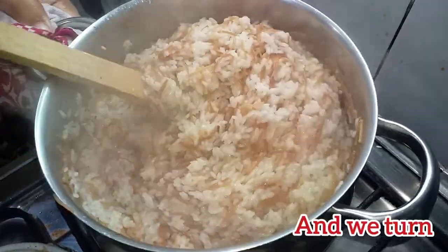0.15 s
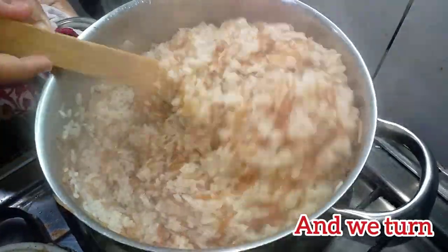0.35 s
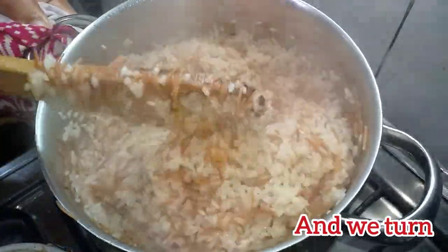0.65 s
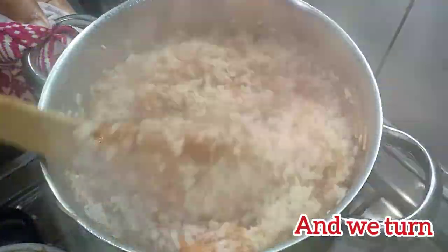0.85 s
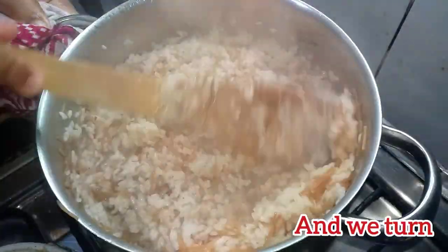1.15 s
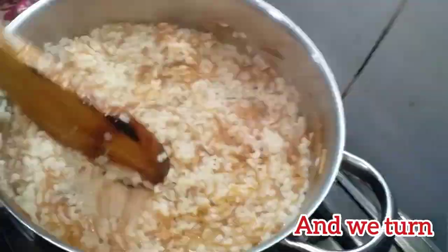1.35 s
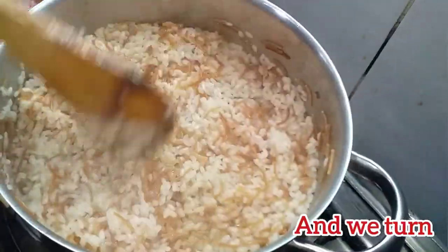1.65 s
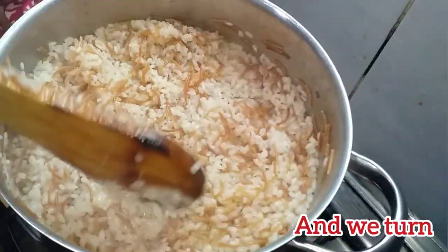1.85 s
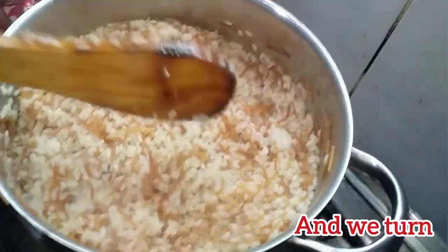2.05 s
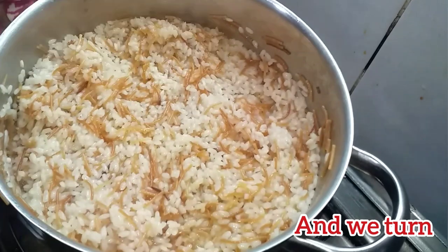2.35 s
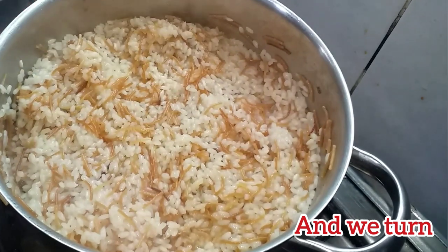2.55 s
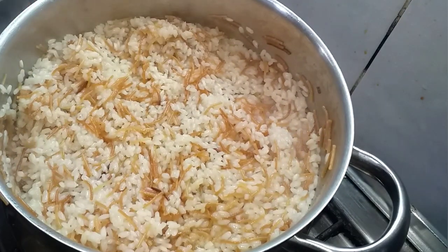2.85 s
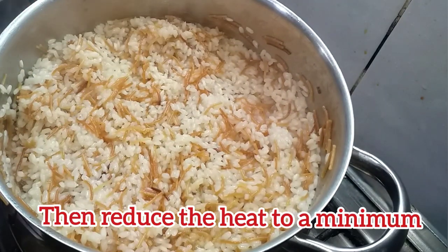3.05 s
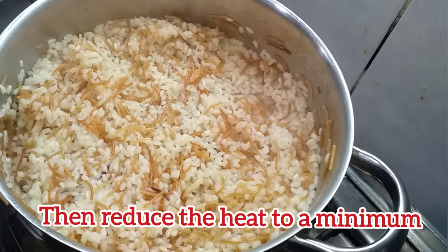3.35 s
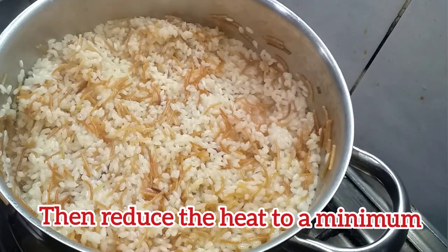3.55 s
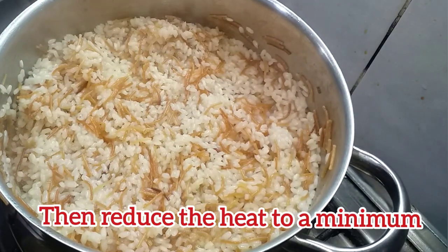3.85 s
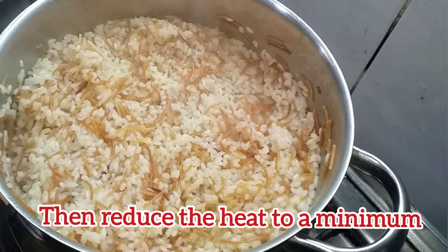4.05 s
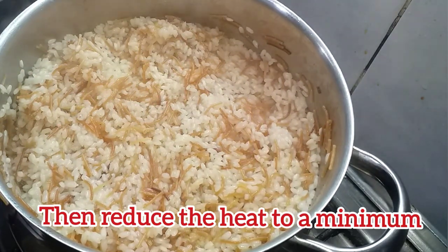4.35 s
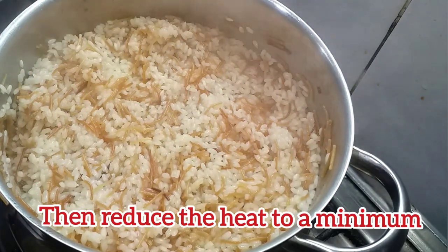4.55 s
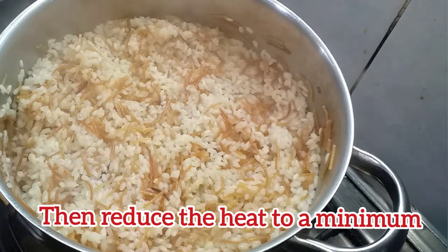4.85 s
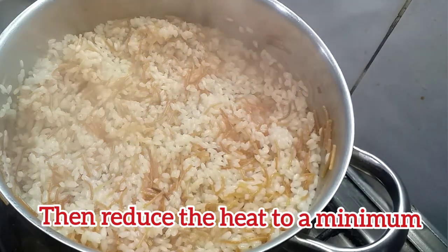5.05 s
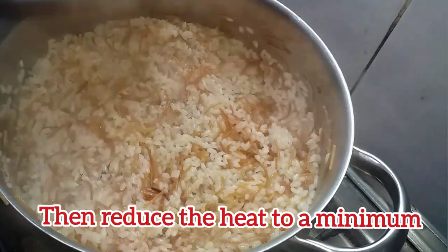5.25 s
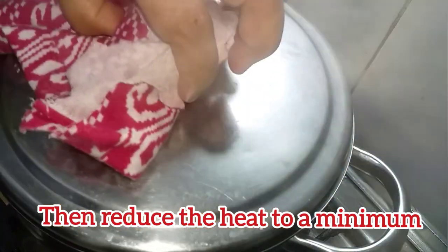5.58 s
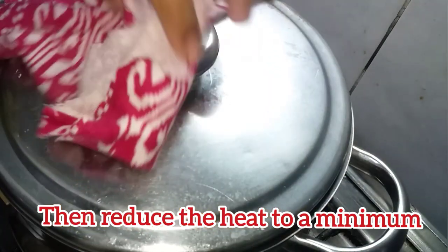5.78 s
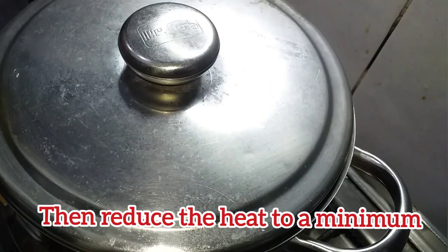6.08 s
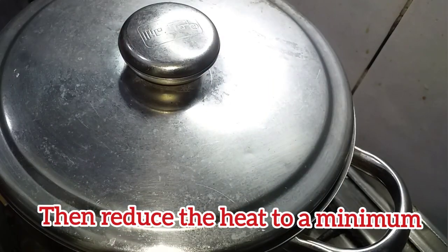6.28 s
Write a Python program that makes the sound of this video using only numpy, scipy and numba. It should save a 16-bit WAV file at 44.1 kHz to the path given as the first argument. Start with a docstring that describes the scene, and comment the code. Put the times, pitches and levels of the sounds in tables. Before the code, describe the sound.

Close to a steel pot in a small kitchen, rice simmers faintly while a wooden spoon scrapes through it and bumps the sides. A quick cluster of hollow knocks lands on the rim. Then come a ringing metal tap, a louder lid clink and scattered light scrapes, ending with a brief rattle as the lid settles. The contacts have a short, dull echo.

```python
"""A wooden spoon knocks and scrapes in a steel pot full of rice, close by in a small kitchen.
Each contact is a short run of micro-slips: knocks ring the belly, wall and bright steel, scrapes only
the wall and steel. A lid clinks, the pot's free rim rings twice and sticky grains tick as they part.
A simmer and room hum waver underneath; hard walls add a short echo to the contacts."""
import sys
import numpy as np
from scipy import signal
from scipy.fft import rfft, irfft
from scipy.io import wavfile
from scipy.ndimage import uniform_filter1d
from numba import njit

SR = 44100
rng = np.random.default_rng(int(sys.argv[2]) if len(sys.argv) > 2 else 0)


def wav_record(signal):
    """Record a signal, one row per channel, as 16-bit PCM in the file named by sys.argv[1]."""
    frames = np.transpose(np.atleast_2d(signal))
    bounded = np.clip(frames, -1, 1)
    # unit amplitude maps onto the largest positive 16-bit level
    quanta = np.round(bounded * 32767).astype(np.int16)
    wavfile.write(sys.argv[1], SR, quanta)


N = 283122

# Simmer and room noise. Each row: time in seconds, level in dB.
SIMMER_LEVELS = [(0, -61.5), (.5, -64), (.75, -70.5), (1.2, -66), (2.401, -63), (2.552, -76.5), (2.66, -71),
                 (3.0, -67), (3.3, -71), (3.6, -60.5), (4.099, -67.5), (4.35, -81.5), (4.603, -67),
                 (5.599, -65), (5.88, -70.5), (6.1, -70), (6.42, -61.5)]
# Background noise colour. Each row: frequency in Hz, gain in dB.
SIMMER_SPECTRUM = [(20, -41), (40, -4.5), (110, 4), (300, -6.5), (890, -3.5), (1700, -10.5), (3300, -6),
                   (5900, 13.5), (16000, -0.5)]
# Clearest grain ticks. Each row: start in seconds, level in dB.
RICE_TICKS = [(0.2338, -59.5), (0.5573, -57), (0.8669, -60.5), (0.912, -55.5), (1.1243, -61.5),
              (2.4616, -58.5), (3.0616, -60.5), (3.227, -70)]

# Lid chatter, light lid touches, pot rim strikes.
# Each row: start in seconds, level in dB, contact in seconds.
LID_CLINKS = [(4.0053, -22, 0.041), (4.0405, -35.5, 0.021)]
LID_TOUCHES = [(5.469, -54, 0.015), (5.742, -65, 0.035), (5.958, -68, 0.03)]
RIM_STRIKES = [(3.3204, -36, 0.014), (4.5243, -57.5, 0.12)]
# Lid mode frequencies in Hz.
LID_MODES_HZ = [1232, 1370, 1440, 2087, 2103, 2182, 2446, 2529, 2536, 2605, 2785, 2925, 2953, 3014, 3227,
                3542, 3712, 4115, 4686, 5423, 6600]
# The same modes, in order. Each row: gain in dB, T60 in seconds.
LID_GAINS_DECAYS = [(2, .2), (-8, 0.15), (-28, .55), (-23, .9), (-22, 0.5), (2, 0.1), (1.5, 0.12), (-29, 1),
                    (-25, .8), (9.5, 0.07), (-15, 0.2), (-8, 0.1), (4.5, 0.07), (-30, 0.55), (5.5, 0.05),
                    (-22.5, 0.5), (-2.5, 0.12), (-26, 0.66), (-20, 0.35), (-8, 0.18), (0, 0.044)]
# Highest lid modes, pot rim modes. Each row: frequency in Hz, gain in dB, T60 in seconds.
LID_TOP_MODES = [(10400, -2, 0.06), (11100, -2, 0.02), (13700, 0, 0.025)]
RIM_MODES = [(1215, 0, 0.4), (1290, -5, 0.7), (1365, 8, 0.2), (1433, -7, 1.2), (1459, -8, 1.2)]

# Pot belly, wall and thin steel resonances. Each row: frequency in Hz, width in Hz, gain in dB.
BELLY_MODES = [(115.5, 22, -4), (190, 50, 0), (458, 30, -3)]
WALL_MODES = [(388.5, 18, -19.5), (637, 65, -11), (869, 104, -7.5), (1080, 450, -17.5), (1362, 25, -15),
              (2005, 83, -14.5), (2683, 26, -22)]
STEEL_MODES = [(4900, 80, 12), (6080, 90, 13), (6700, 70, 6)]
# Bright contact colour. Each row: frequency in Hz, gain in dB.
BRIGHT_SPECTRUM = [(800, -8), (2000, -3.5), (3500, 0), (5000, 3.5), (7000, -3.5), (16000, -15.5)]
# Top treble within the scrapes. Each row: time in seconds, relative gain in dB.
SCRAPE_TREBLE = [(0, -14), (.9, -22), (1.2, -2), (3.3, 9), (3.6, -3.5), (5.4, 5.5), (5.75, 18), (6.1, -12)]
# Slides over steel. Each row: start in seconds, steel level in dB, wall level in dB,
# steel pitch in Hz, wall pitch in Hz, contact in seconds.
SPOON_SCRAPES = [(0.27, -51.5, -69, 6240, 590, 0.0058), (0.351, -30.5, -46, 4350, 1020, 0.012),
                 (0.5827, -48.5, -55, 4600, 1591, 0.021), (0.869, -59, -60, 5900, 547, 0.047),
                 (1.003, -57.5, -52.5, 4800, 850, 0.011), (1.224, -37.5, -43, 4800, 613, 0.023),
                 (1.253, -35, -42, 4250, 2030, 0.0068), (1.3, -50.5, -49.5, 5350, 600, 0.038),
                 (1.378, -43, -48, 5400, 963, 0.014), (1.43, -37.5, -38.5, 5900, 920, 0.027),
                 (1.4787, -30.5, -33, 5270, 958, 0.0099), (1.5083, -36, -42, 4800, 2057, 0.012),
                 (1.6626, -49.5, -60, 5740, 1290, 0.008), (1.8034, -56, -54.5, 4420, 965, 0.02),
                 (2.372, -54.5, -61.5, 5430, 870, 0.016), (2.826, -42, -55.5, 4310, 2710, 0.055),
                 (2.9382, -53, -63, 4740, 945, 0.014), (3.14, -71, -61.5, 5050, 1250, 0.039),
                 (3.4133, -48, -51, 5550, 1390, 0.097), (3.458, -41, -57, 4800, 1285, 0.028),
                 (3.633, -42.5, -45.5, 6600, 580, 0.012), (3.706, -37.5, -56.5, 5060, 690, 0.013),
                 (3.7809, -47.5, -48.5, 2890, 2030, 0.013), (3.869, -46, -56.5, 4250, 940, 0.011),
                 (3.9089, -53, -52, 6200, 2254, 0.015), (3.9423, -37, -59, 5230, 790, 0.014),
                 (4.0073, -36, -35, 3340, 1287, 0.036), (4.1992, -60, -61.5, 4300, 897, 0.016),
                 (4.525, -46.5, -51.5, 6700, 730, 0.014), (4.59, -43, -51, 6850, 696, 0.035),
                 (4.67, -67, -50.5, 5000, 1995, 0.015), (4.839, -34.5, -33.5, 6160, 1000, 0.015),
                 (5.0113, -63.5, -45.5, 4900, 972, 0.018), (5.0578, -43, -51, 4750, 660, 0.14),
                 (5.2234, -43.5, -55, 6240, 690, 0.013), (5.264, -44, -58.5, 6070, 1960, 0.012),
                 (5.357, -49, -57, 4830, 1210, 0.017), (5.401, -51.5, -36.5, 3140, 1253, 0.026),
                 (5.4264, -35, -44.5, 4900, 663, 0.025), (5.471, -34.5, -26, 2750, 1344, 0.0067),
                 (5.502, -49.5, -38.5, 2460, 1370, 0.0061), (5.5915, -47.5, -51, 5950, 640, 0.058),
                 (5.7428, -52, -65.5, 5730, 1090, 0.013), (5.956, -48.5, -83, 4300, 2090, 0.015),
                 (6.028, -46.5, -52.5, 5770, 1526, 0.014), (6.1657, -47, -55.5, 4920, 840, 0.01),
                 (6.305, -42, -46, 5140, 830, 0.014)]
# Leading resonances by spot struck. Each entry: belly pitch in Hz, belly width in Hz, wall pitch in Hz.
SPOT_RESONANCES = {"rim": (184, 28, 1470), "side": (345, 66, 740), "bottom": (118, 8, 1830),
                   "edge": (267, 66, 670), "rice": (165, 46, 1010), "lip": (71, 71, 1000),
                   "base": (370, 43, 970)}
# Spoon blows. Each row: start in seconds, spot, belly level in dB, wall level in dB,
# steel level in dB, contact in seconds.
SPOON_KNOCKS = [(0.042, "edge", -47.5, -52.5, -61, 0.0063), (0.064, "bottom", -43.5, -46, -47, 0.0042),
                (0.299, "bottom", -39, -41.5, -31.5, 0.005), (0.433, "rice", -44.5, -47, -44, 0.0052),
                (0.829, "rice", -47, -105, -84, 0.04), (1.957, "rim", -28, -36.5, -37.5, 0.026),
                (1.967, "rim", -35, -31, -33.5, 0.0062), (2.054, "rim", -24, -35, -40.5, 0.01),
                (2.131, "rim", -24.5, -27.5, -40.5, 0.0049), (2.158, "rim", -32.5, -74, -45.5, 0.0087),
                (2.22, "rim", -28.5, -41.5, -40.5, 0.0062), (2.667, "side", -36, -39, -54, 0.0048),
                (2.725, "side", -42.5, -51, -59.5, 0.021), (3.3217, "base", -44, -29.5, -37, 0.0035),
                (3.337, "side", -37, -41, -44.5, 0.038), (3.962, "side", -40, -40.5, -67, 0.017),
                (4.043, "lip", -37, -36, -53, 0.0029), (5.373, "lip", -70, -38, -74, 0.0043),
                (5.559, "edge", -46.5, -72, -58, 0.029), (5.636, "edge", -37.5, -32, -46.5, 0.0048)]
# Treble dip above 6 kHz. Each row: frequency in Hz, gain in dB.
TREBLE_DIP = [(6300, -3.5), (7200, -11.5), (8600, -23), (11000, -13), (16000, -3)]

LEAD_S = 0.0018  # contacts begin this far ahead of their listed start
WALL_WIDTH_HZ_S = 0.74  # width times contact time: short contacts damp the wall


def undb(db):
    """Decibels to amplitude."""
    return 10 ** (np.asarray(db) / 20)


@njit
def bandpass(x, hz, width_hz):
    """State-variable band-pass, gain 1 at the centre."""
    y, band, low = np.empty(len(x)), 0., 0.
    g, damping = np.tan(np.pi * hz / SR), width_hz / hz
    for i in range(len(x)):
        v = (band + g * (x[i] - low)) / (1 + g * (g + damping))
        band, low = 2 * v - band, low + 2 * g * v
        y[i] = damping * v
    return y


def ring(force, modes, scatter_db):
    """Sum of resonances; each contact point drives them a little differently."""
    offsets_db = scatter_db * rng.standard_normal(len(modes))
    return sum(undb(db + offset_db) * bandpass(force, float(hz), float(width_hz)) / np.sqrt(width_hz)
               for (hz, width_hz, db), offset_db in zip(modes, offsets_db))


def spectrum_db(hz, spectrum):
    """Interpolate (Hz, dB) points over log frequency."""
    points_hz, points_db = np.transpose(spectrum)
    return np.interp(np.log(hz), np.log(points_hz), points_db)


def colour(x, spectrum=((20, 0), (SR, 0)), lo_hz=0., hi_hz=SR):
    """Filter by a spectrum, flat by default, between third-order edges."""
    hz = np.maximum(np.arange(len(x) // 2 + 1) * SR / len(x), 1.)
    rolloff = np.sqrt((1 + (lo_hz / hz) ** 6) * (1 + (hz / hi_hz) ** 6))
    return irfft(rfft(x) * undb(spectrum_db(hz, spectrum)) / rolloff, len(x))


def waver(rate_hz):
    """Random steps smoothed twice; spread near 1."""
    hold = int(SR / rate_hz)
    steps = np.repeat(rng.standard_normal(N // hold + 1), hold)
    return np.sqrt(2) * uniform_filter1d(uniform_filter1d(steps, hold), hold)[:N]


def slips(contact_s, t60_s, rise_s, spread_db):
    """Force of one contact: uneven micro-slips that swell, hold and die away."""
    t = np.arange(SR // 3) / SR
    swell = 1 - np.exp(-t / rise_s)
    release = undb(-60 * np.maximum(t - contact_s, 0) / t60_s)
    sizes = undb(spread_db * np.repeat(rng.standard_normal(len(t) // 60), 60))
    return swell * release * sizes * rng.standard_normal(len(t)) + 1e-18


def add(out, start_s, x, db):
    """Mix in x with its loudest 10 ms at db and its end faded."""
    i = int((start_s - LEAD_S) * SR)
    peak_rms = np.sqrt(uniform_filter1d(x ** 2, size=SR // 100).max())
    fade = np.clip(np.linspace(5, -.5, len(x)), 0, 1) ** 2
    out[i:i + len(x)] += (x * fade * undb(db) / peak_rms)[:len(out) - i]


def simmer(hum_db=-2, fizz_db=-10, wall_db=-9):
    """Room hum, mid murmur, treble fizz and the ringing pot wall, each wavering on its own."""
    out = np.zeros(N)
    for db, lo_hz, hi_hz in ((hum_db, 0., 250.), (0., 300., 2500.), (fizz_db, 2800., SR)):
        band = colour(rng.standard_normal(N), SIMMER_SPECTRUM, lo_hz, hi_hz)
        out += band / band.std() * undb(db + 2.2 * waver(rate_hz=17))
    wall = ring(rng.standard_normal(N), WALL_MODES, scatter_db=3.1)
    out += wall / wall.std() * undb(wall_db + 4.4 * waver(rate_hz=7.1))
    return out * undb(np.interp(np.arange(N) / SR, *np.transpose(SIMMER_LEVELS)))


def rice_ticks(faint_max_db=-74.5, faint_count=22):
    """Sticky grains part: a few clear ticks, fainter ones at random."""
    out = np.zeros(N)
    faint = [(0.031 + 4.1 * when, faint_max_db - 10 * drop)
             for when, drop in rng.random((faint_count, 2))]
    for start_s, db in list(RICE_TICKS) + faint:
        force = slips(contact_s=0.005, t60_s=0.05, rise_s=0.002, spread_db=3.7)
        add(out, start_s, colour(force, BRIGHT_SPECTRUM, lo_hz=3000.), db)
    return out


def chime(events, modes):
    """Lightly damped modes, driven by chatter and left to ring."""
    out = np.zeros(N)
    for start_s, db, contact_s in events:
        force = np.pad(slips(contact_s, t60_s=0.078, rise_s=0.0018, spread_db=1.), (0, SR // 2))
        power = np.abs(rfft(force)) ** 2
        bins_hz = np.arange(len(power)) * SR / len(force)
        levelled = []
        for hz, mode_db, t60_s in modes:
            width_hz = np.log(1000) / (np.pi * t60_s)
            in_band = np.abs(bins_hz - hz) < 1 + width_hz / 2
            # even out the random drive so each mode gets about its usual share
            drive = np.clip(power[in_band].mean() / power.mean(), .1, 10)
            levelled.append((hz, width_hz, mode_db - 10 * np.log10(width_hz * drive)))
        add(out, start_s, ring(force, levelled, scatter_db=0.34), db)
    return out


def pot_rim():
    """The free rim rings on after a strike."""
    return chime(RIM_STRIKES, RIM_MODES)


def lid():
    """The lid chatters on steel; light touches wake only its highest modes."""
    modes = [(hz, db, t60_s) for hz, (db, t60_s) in zip(LID_MODES_HZ, LID_GAINS_DECAYS)]
    return chime(LID_CLINKS, modes) + chime(LID_TOUCHES, LID_TOP_MODES)


def pot_wall(force, hz, width_hz, body_db):
    """The resonance nearest the contact plus the wall's own; thick steel carries no top."""
    nearest = bandpass(force, float(hz), width_hz) / np.sqrt(width_hz)
    body = undb(body_db) * ring(force, WALL_MODES, scatter_db=4.)
    return colour(nearest + body, hi_hz=4500.)


def thin_steel(force, lead_hz, treble_db):
    """Narrow modes that change with the contact point, over hiss and gritty treble."""
    crowd = [(hz, 45., spectrum_db(hz, BRIGHT_SPECTRUM)) for hz in rng.uniform(1500., 7500., size=32)]
    treble = colour(colour(force, BRIGHT_SPECTRUM), BRIGHT_SPECTRUM[-2:], lo_hz=7100.)
    grit_modes = [(hz, 110., 0.) for hz in rng.uniform(8000., 15500., size=14)]
    grit = ring(treble, grit_modes, scatter_db=4.)
    tones = ring(force, [(lead_hz, 90., 13.5)] + STEEL_MODES + crowd, scatter_db=5.)
    hiss = colour(force, BRIGHT_SPECTRUM, hi_hz=8000.)
    return tones + undb(-25) * hiss + undb(treble_db) * (undb(-7) * treble + undb(11) * grit)


def spoon_scrapes():
    """Slides ring thin steel and some wall; longer ones swell and die more slowly."""
    out = np.zeros(N)
    for start_s, steel_db, wall_db, steel_hz, wall_hz, contact_s in SPOON_SCRAPES:
        t60_s = min(0.19, 11.9 * contact_s)
        force = slips(contact_s, t60_s, rise_s=0.004 + 0.12 * contact_s, spread_db=3.)
        treble_db = np.interp(start_s, *np.transpose(SCRAPE_TREBLE))
        add(out, start_s, thin_steel(force, steel_hz, treble_db), steel_db)
        wall_width_hz = max(42., WALL_WIDTH_HZ_S / contact_s)
        add(out, start_s, pot_wall(force, wall_hz, wall_width_hz, body_db=0.5), wall_db)
    return out


def spoon_knocks(hard_contact_s=0.016):
    """Blunt blows: the loaded belly thuds, wall and steel answer; soft wood drives little top treble."""
    out = np.zeros(N)
    for start_s, spot, belly_db, wall_db, steel_db, contact_s in SPOON_KNOCKS:
        belly_hz, belly_width_hz, wall_hz = SPOT_RESONANCES[spot]
        t60_s = min(0.11, 17.4 * contact_s)
        force = slips(contact_s, t60_s, rise_s=0.067 * contact_s, spread_db=2.1)
        add(out, start_s, colour(force, BRIGHT_SPECTRUM, hi_hz=8800.), steel_db)
        force[int(LEAD_S * SR)] += (hard_contact_s / contact_s) ** 2  # shorter contact, harder crack
        dull_force = colour(force, [(20, 9), (100, -1), (700, -1), (16000, -44)], lo_hz=83.5)
        thud = ring(dull_force, BELLY_MODES + [(belly_hz, belly_width_hz, 8.)], scatter_db=3.)
        add(out, start_s, thud, belly_db)
        wall_width_hz = max(120., WALL_WIDTH_HZ_S / contact_s)
        add(out, start_s, pot_wall(force, wall_hz, wall_width_hz, body_db=0.), wall_db)
    return out


def scene(room_t60_s=0.2, echo_db=-16):
    """Contacts and their short, duller kitchen echo over the simmer; mono."""
    contacts = spoon_knocks() + spoon_scrapes() + lid() + pot_rim() + rice_ticks()
    t = np.arange(SR // 2) / SR
    tail = bandpass(rng.standard_normal(len(t)), hz=530., width_hz=8300.)
    tail *= undb(-60 * t / room_t60_s) * (t > .006)
    echo = signal.fftconvolve(contacts, tail / np.sqrt(np.sum(tail ** 2)))[:N]
    return (contacts + undb(echo_db) * echo + simmer())[None]


def record(dry, cutoff_hz=15650):
    """A treble dip above 6 kHz, then a steep low-pass."""
    lowpass = signal.ellip(10, .2, 80, cutoff_hz, fs=SR, output="sos")
    return signal.sosfilt(lowpass, colour(dry[0], TREBLE_DIP))[None]


dry = scene()
out = record(dry)
wav_record(out)
```